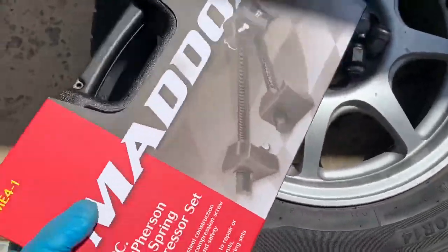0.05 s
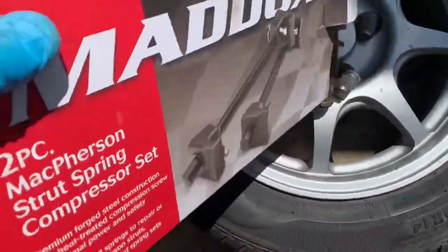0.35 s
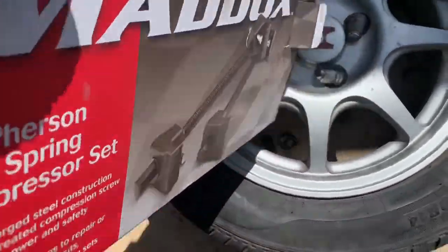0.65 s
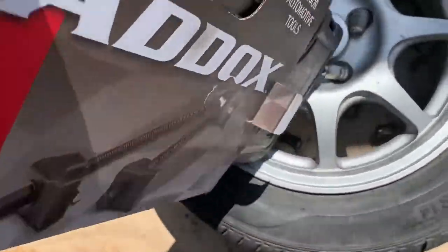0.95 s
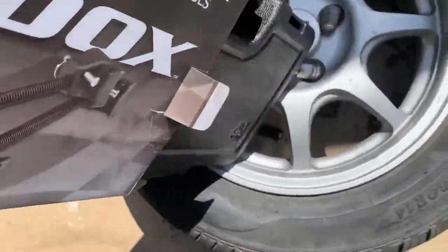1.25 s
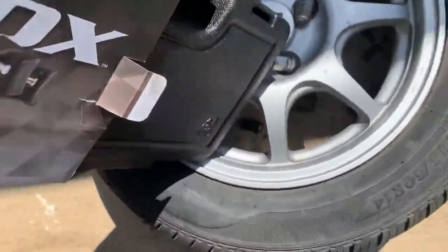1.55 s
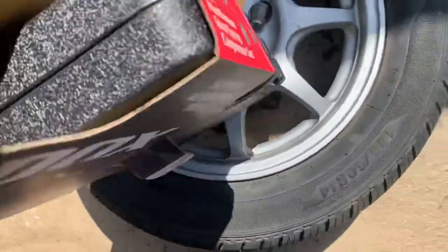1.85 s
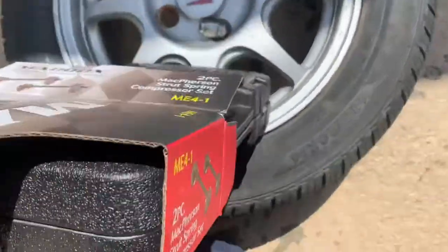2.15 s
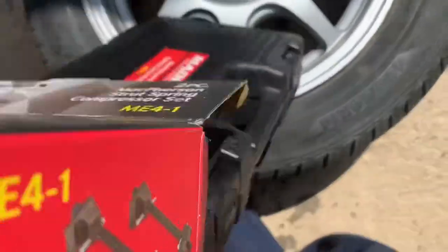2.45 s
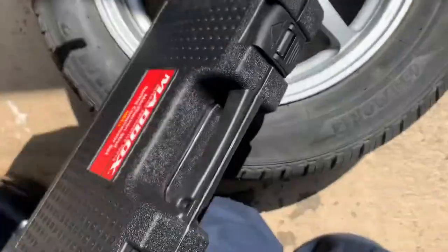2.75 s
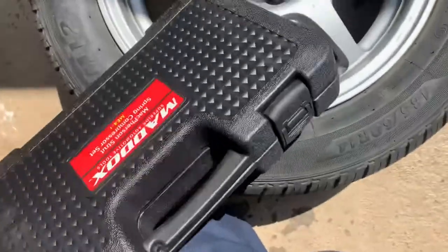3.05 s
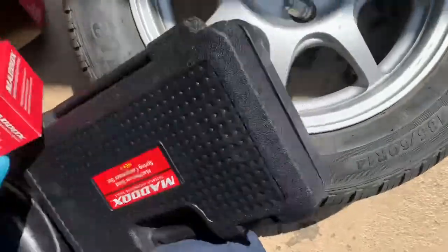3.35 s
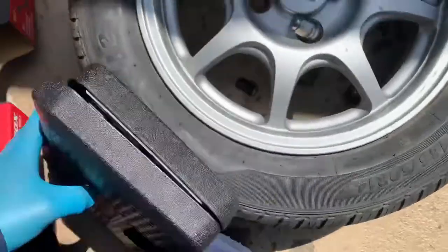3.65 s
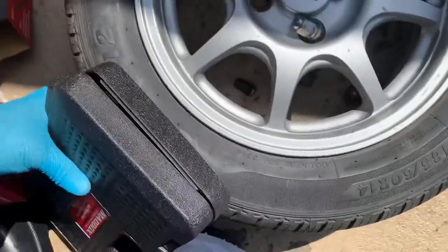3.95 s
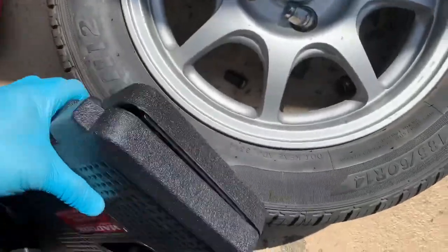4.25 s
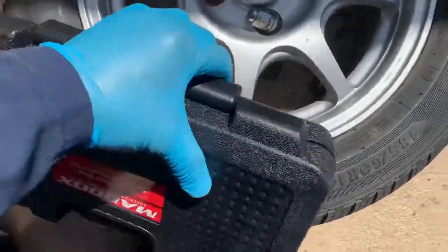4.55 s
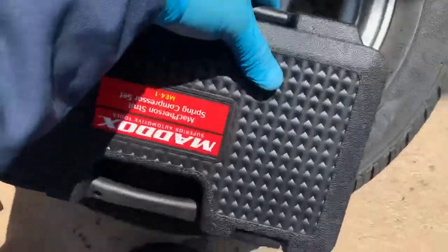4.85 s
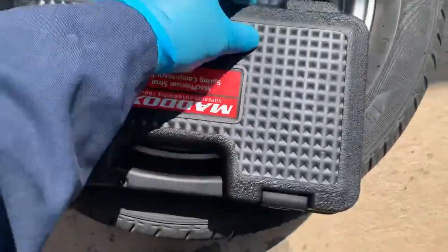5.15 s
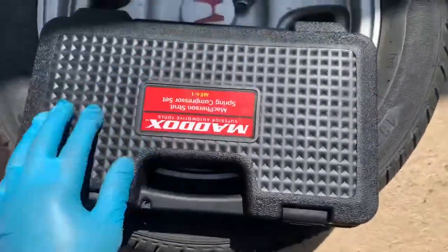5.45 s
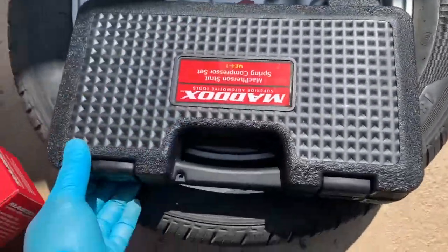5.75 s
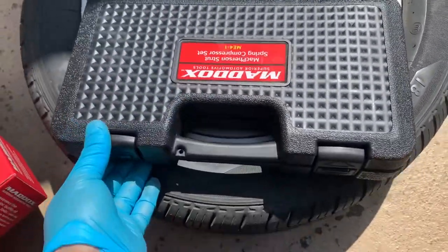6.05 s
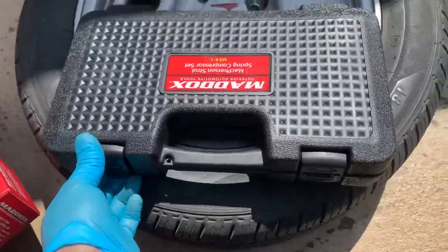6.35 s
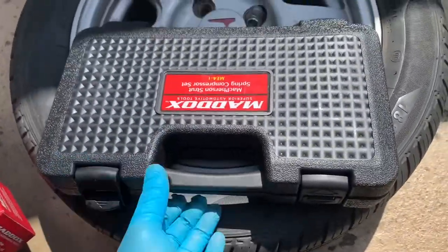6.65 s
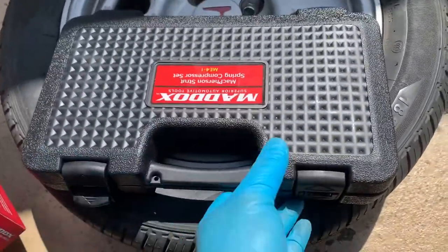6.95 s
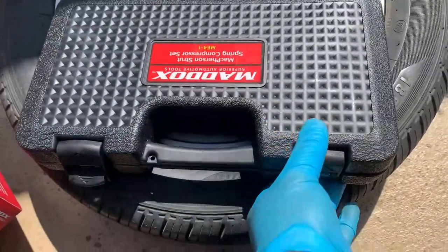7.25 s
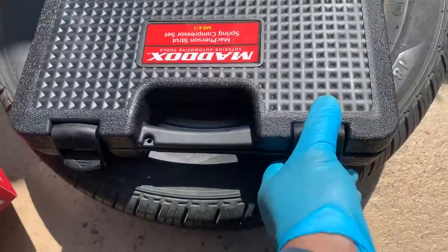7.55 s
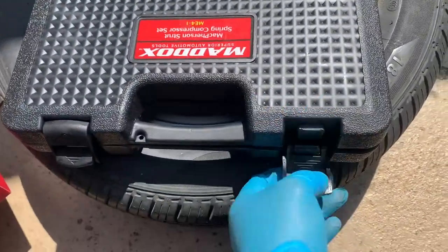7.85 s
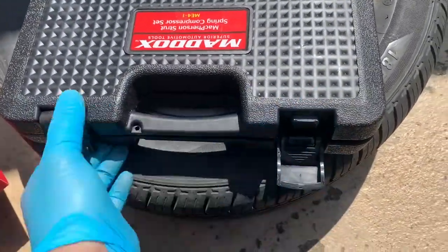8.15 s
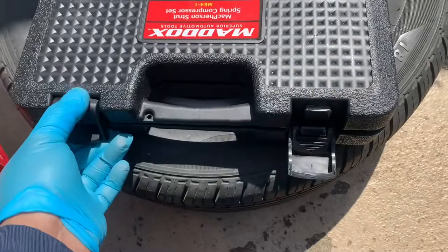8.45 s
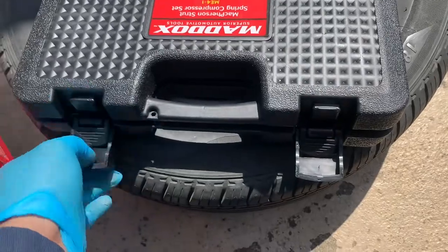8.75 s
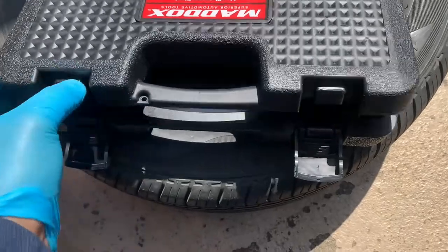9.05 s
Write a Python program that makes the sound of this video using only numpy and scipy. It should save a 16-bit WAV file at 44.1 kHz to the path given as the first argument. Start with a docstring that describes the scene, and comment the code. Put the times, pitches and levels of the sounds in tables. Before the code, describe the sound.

Cardboard rasps and steel tools clunk in a plastic case being unpacked outdoors, followed by glove scuffs and two latch snaps.

```python
"""Outdoors, close up, over low buffeting air, a hollow plastic tool case is shaken out of its card sleeve. The
sleeve first scrapes an alloy car wheel, which rings; the case rasps out in uneven tugs, free by 3 s. Gloves
turn the case over and lay it on a tyre while steel tools slide, clink and knock on the shell. From 5 s fingers
scuff and squeak along the rim; a latch is flipped at 6.4 s. Two latches snap open at 7.4 and 7.8 s, thudding on
the shell and drumming the lid, and at 9 s the hinge creaks as the lid lifts."""
import sys
import numpy as np
from scipy import signal
from scipy.fft import rfft, irfft, next_fast_len
from scipy.io import wavfile
from scipy.ndimage import uniform_filter1d, map_coordinates

SR = 44100
rng = np.random.default_rng(int(sys.argv[2]) if len(sys.argv) > 2 else 0)


def generate_wav(signal):
    """Clip the signal to [-1, 1] and save it as 16-bit WAV at the path in sys.argv[1]."""
    frames = np.transpose(np.atleast_2d(signal))
    scaled = np.clip(frames, -1, 1) * 32767
    pcm = np.round(scaled).astype(np.int16)
    wavfile.write(sys.argv[1], SR, pcm)


N = 409688
TIME = np.arange(N) / SR
AGE = TIME[:SR // 3]  # time since a blow [s]


def undb(db):
    """Decibels to gain."""
    return 10 ** (np.asarray(db) / 20)


def unit(x):
    """Scale a steady sound to rms 1."""
    return x / np.sqrt(np.mean(x ** 2))


def burst(x):
    """Scale a blow to the energy of 20 ms at rms 1."""
    return x / np.sqrt(np.sum(x ** 2) / len(x) / (SR / 50))


def add(out, s, x):
    """Mix a short sound in at time s."""
    i = int(s * SR)
    x, i = x[:, max(-i, 0):], max(i, 0)
    out[:, i:i + x.shape[1]] += x[:, :N - i]


def later(x, s):
    """Delay a blow by s seconds."""
    return np.pad(x, ((0, 0), (int(s * SR), 0)))[:, :len(AGE)]


def curve(rows):
    """One gain curve per dB column; silent outside the table's span."""
    times, *columns = np.transpose(rows)
    inside = uniform_filter1d(1. * ((TIME >= times[0]) & (TIME <= times[-1])), SR // 25)
    return np.array([inside * undb(np.interp(TIME, times, db)) for db in columns])


def stroke(start, length):
    """Envelope of a slide; longer ones start and end more gently."""
    ease_s = .054 * length
    attack = 1 + np.tanh((TIME - start) / (.0073 + ease_s))
    release = 1 - np.tanh((TIME - start - length) / (.02 + ease_s))
    return attack * release / 4


def onset(rise_s):
    """Contact building from 0 to 1."""
    return 1 - np.exp(-(AGE / rise_s) ** 2)


def fade(t60_s):
    """Exponential decay."""
    return np.exp(-np.log(1000) * AGE / t60_s)


def swell(rise_s):
    """Rounded rise to 1, slightly slower fall."""
    return (AGE / rise_s * np.exp(1 - AGE / rise_s)) ** 2


def noise(size, width):
    """Stereo white noise; width is side over mid."""
    mid, side = rng.standard_normal((2, size))
    return np.array([mid + width * side, mid - width * side])


def walk(rate_hz):
    """Smooth random wander, rms 1."""
    step = max(int(SR / rate_hz), 1)
    stairs = np.repeat(rng.standard_normal(N // step + 1), step)
    return unit(uniform_filter1d(stairs, step)[:N])


def colour(x, spectrum):
    """Minimum-phase filter with the given (Hz, dB) outline."""
    hz, db = np.transpose(spectrum)
    size = 4096
    grid = np.maximum(np.fft.rfftfreq(size, 1 / SR), 1)
    cepstrum = irfft(np.log(undb(np.interp(np.log(grid), np.log(hz), db))))
    cepstrum[1:size // 2] *= 2
    cepstrum[size // 2 + 1:] = 0
    response = irfft(np.exp(rfft(cepstrum)))
    return signal.fftconvolve(x, response[None], axes=1)[:, :x.shape[1]]


def splash(spectrum, t60_s, rise_s, width, tail_db):
    """Short modes too dense to tell apart, with a faint longer tail."""
    envelope = onset(rise_s) * (fade(t60_s) + undb(tail_db) * fade(3 * t60_s))
    return burst(colour(noise(len(AGE), width) * envelope, spectrum))


def ring(modes, scatter_db, spread_rad, detune=0, lead_s=0):
    """Decaying modes, weighted anew on each call; the left side leads by about lead_s."""
    out = 0
    for (hz, db, t60_s), (size, lag, tune, sign) in zip(modes, rng.standard_normal((len(modes), 4))):
        stereo_rad = (spread_rad * lag + np.pi * hz * lead_s) * np.array([[1], [-1]])
        phase = 2 * np.pi * hz * (1 + detune * tune) * AGE + stereo_rad
        out = out + np.sign(sign) * undb(db + scatter_db * size) * fade(t60_s) * np.sin(phase)
    return out


def struck_near(modes, pitch_hz, db_per_oct):
    """The place of a blow favours the modes near one pitch."""
    return [(hz, db - db_per_oct * abs(np.log2(hz / pitch_hz)), t60_s) for hz, db, t60_s in modes]


def drum(hz, rise_s, skew_rad):
    """A broad panel swells and dies within a few cycles; the left side leads by skew_rad."""
    return swell(rise_s) * np.sin(2 * np.pi * hz * AGE + skew_rad / 2 * np.array([[1], [-1]]))


def resonate(x, response):
    """Convolve with a response scaled to unit energy per side."""
    return signal.fftconvolve(x, response / np.sqrt(np.sum(response ** 2) / 2), axes=1)[:, :N]


def bend(x, ratio):
    """Shift all resonances of a steady sound by a moving ratio."""
    position = np.cumsum(ratio) % (N - 1)
    return np.array([map_coordinates(side, [position], order=2) for side in x])


def flexing():
    """Pitch ratio of a resonance wandering under a moving hand."""
    return 1 + .03 * walk(22)


def friction(slip_hz, scatter_db, jerk_db, jerk_hz, smooth, width):
    """Tiny uneven slips over a smooth rush; the motion comes in jerks."""
    sizes = (rng.random(N) < slip_hz / SR) * undb(scatter_db * np.minimum(rng.exponential(size=N), 4))
    slips = unit(sizes * np.tanh(noise(N, width)))
    rush = smooth * noise(N, width)
    return (slips + rush) * undb(jerk_db * np.clip(walk(jerk_hz), -2, 2))


def scraping(spectrum, slip_hz):
    """Slips on pebbled plastic, coloured by brief high shell modes that shift with the contact."""
    slips = friction(slip_hz, scatter_db=1, jerk_db=2, jerk_hz=60, smooth=.98, width=.91)
    rasp = colour(slips, spectrum)
    weights = np.array([undb(5 * walk(18)) for _ in range(4)])
    weights = weights / np.sqrt(np.sum(weights ** 2, axis=0))
    ragged = sum(weight * resonate(rasp, noise(len(AGE), .75) * fade(.0048)) for weight in weights)
    return unit(rasp + undb(-1.5) * ragged)


# air between gusts: (time [s], relative level [dB])
AIR_LEVELS = [(0.0, -33), (0.8, -44), (0.93, -30), (1.99, -42), (2.53, -30.5), (3.0, -46.5), (3.28, -49.5),
              (3.65, -31), (3.83, -45), (6.49, -42.5), (7.63, -33), (7.79, -36), (8.41, -41), (9.29, -40)]
# buffeting and outdoor background: (frequency [Hz], level [dB])
BUFFET_SPECTRUM = [(18, -31.5), (32, -14), (48, 0.5), (65, 2), (100, -2), (140, -5), (200, -12), (300, -17),
                   (500, -68)]
OUTDOOR_SPECTRUM = [(60, -11), (110, -3), (250, -23.5), (400, -6.5), (800, -26), (1500, -33.5), (4000, -42),
                    (8000, -52), (14000, -59.5)]


def air(shell_gain):
    """Low buffeting, stronger while the case moves, over a faint wavering background."""
    calm, = curve(AIR_LEVELS)
    buffet = unit(colour(noise(N, .53), BUFFET_SPECTRUM) * undb(2.5 * walk(16)))
    background = unit(colour(noise(N, .81), OUTDOOR_SPECTRUM)) * undb(3.5 * walk(6.5))
    return (undb(3.5) * calm + undb(-9.5) * shell_gain) * buffet + undb(-48) * background


# case tugged out of its sleeve, in curve segments: (time [s], shell [dB], card [dB], hiss [dB])
SLEEVE_SLIDE = [
    [(0, -45, -44.5, -46.5), (.11, -36, -39, -41.5), (.16, -24, -30, -44), (.32, -30, -36, -45),
     (.4, -32, -49.5, -54), (.51, -43, -49.5, -70.5)],
    [(.54, -34.5, -36, -44), (.62, -30.5, -37, -39.5), (.69, -22, -15.5, -19.5), (.745, -26, -41.5, -37),
     (.82, -22.5, -39.5, -45), (.98, -35, -50.5, -61.5), (1.04, -38, -36.5, -52),
     (1.17, -30.5, -40.5, -47.5), (1.25, -65, -75, -81)],
    [(1.51, -45, -68, -93), (1.65, -38, -55, -60), (1.78, -33.5, -38, -45.5), (1.86, -47, -49.5, -55),
     (1.92, -34, -40, -44.5), (2.05, -43, -59, -62)],
    [(2.04, -41, -49, -47), (2.19, -35, -47, -52), (2.25, -24, -27.5, -26.5), (2.33, -27, -26.5, -29),
     (2.39, -23.5, -34.5, -40), (2.42, -22.5, -35, -39.5), (2.48, -25.5, -48, -49), (2.51, -41.5, -58, -50),
     (2.56, -34, -44, -48), (2.6, -36.5, -61, -62), (2.75, -34.5, -59.5, -69), (2.93, -49, -55, -57)],
]
# tools sliding in their nests: (start [s], length [s], level [dB])
TOOL_SLIDES = [(1.236, 0.18, -42.5), (3.187, 0.12, -35), (3.376, 0.4, -43), (3.633, 0.18, -34.5),
               (4.092, 0.21, -38), (4.517, 0.27, -39), (5.033, 0.16, -36)]
# gloves and cloth on the case: (start [s], length [s], scrape [dB], hiss [dB])
GLOVE_RUBS = [(2.958, 0.26, -50, -51.5), (3.11, 0.11, -54, -48), (3.24, 0.092, -66, -53),
              (3.344, 0.29, -48.5, -46.5), (3.633, 0.12, -48.5, -51.5), (3.76, 0.31, -58, -58.5),
              (4.086, 0.15, -57, -59), (4.22, 0.13, -50.5, -46.5), (4.354, 0.78, -55.5, -60.5),
              (4.976, 0.22, -49.5, -50), (5.221, 0.3, -53.5, -40.5), (5.54, 0.17, -61, -54.5),
              (5.769, 0.048, -55, -56.5), (6.272, 0.12, -59.5, -68), (6.54, 0.13, -62, -50),
              (6.713, 0.032, -54.5, -54), (6.775, 0.12, -58.5, -60), (6.987, 0.1, -58, -53),
              (7.144, 0.062, -52, -54), (7.237, 0.068, -60, -58), (7.377, 0.11, -64, -64),
              (7.633, 0.29, -56, -59), (7.943, 0.082, -56, -46.5), (8.108, 0.17, -59.5, -57),
              (8.556, 0.089, -56, -60), (8.73, 0.077, -68.5, -56), (8.983, 0.19, -59, -60),
              (9.216, 0.13, -61.5, -60)]


def handling():
    """Friction gains as the sleeve comes off, the tools slide and hands turn the case."""
    shell, card, hiss = sum(curve(segment) for segment in SLEEVE_SLIDE)
    grip = stroke(start=2.7, length=TIME[-1])
    glove = undb(-68) * grip
    hiss = hiss + undb(-77) * grip
    for start, length, scrape_db, hiss_db in GLOVE_RUBS:
        rub = stroke(start, length)
        glove = glove + undb(scrape_db) * rub
        hiss = hiss + undb(hiss_db) * rub
    sliding = sum(undb(db) * stroke(start, length) for start, length, db in TOOL_SLIDES)
    return shell + sliding + undb(3.5) * glove, card, glove, hiss


# hollow shell; stiff ribs and corners: (frequency [Hz], level [dB], t60 [s])
SHELL_MODES = [(203.3, -5, 0.17), (301, -14.5, 0.039), (346.4, -1, 0.13), (391.2, -0.5, 0.087),
               (442, -1.5, 0.086), (520, -4.5, 0.094), (601.2, -2, 0.09), (644.6, -13.5, 0.12),
               (728.5, -2.5, 0.054), (818, -4.5, 0.061)]
RIB_MODES = [(870, -5, 0.044), (983, -8, 0.22), (1053, 0, 0.072), (1166, -0.5, 0.089), (1301, 0.5, 0.083),
             (1362, -4.5, 0.077), (1550, -1, 0.036), (1656, -3, 0.035), (1760, -16.5, 0.066)]
# rubbed shell: (frequency [Hz], level [dB])
DRONE_SPECTRUM = [(120, -24), (230, -9), (340, 6.5), (430, 0), (520, 2), (620, -3), (900, -9.5),
                  (1300, -20.5), (2200, -48.5)]


def shell_drone():
    """Sliding contact makes the hollow shell drone; loose parts rattle on its ribs."""
    judder = friction(slip_hz=580, scatter_db=1.5, jerk_db=3.5, jerk_hz=40, smooth=.44, width=.38)
    shell = ring(SHELL_MODES, scatter_db=1, spread_rad=.51, lead_s=.000073)
    hollow = unit(bend(resonate(judder, shell), flexing()))
    drone = unit(unit(colour(judder, DRONE_SPECTRUM)) + undb(-5) * hollow)
    loose = friction(slip_hz=130, scatter_db=2.5, jerk_db=1.5, jerk_hz=11, smooth=0, width=.5)
    rattle = unit(resonate(loose, ring(RIB_MODES, scatter_db=1, spread_rad=1)))
    return drone + undb(-16) * rattle


# card on plastic: (frequency [Hz], level [dB])
CARD_SPECTRUM = [(530, -19), (900, 2), (1420, -3), (1900, 0.5), (2900, -3), (3400, -7), (3900, -3),
                 (5000, -9.5), (8200, -13.5), (11700, -35)]
# card sleeve: (frequency [Hz], level [dB], t60 [s])
SLEEVE_MODES = [(955, -6.5, .02), (1250, -8, .025), (1950, 4, 0.038), (2290, 1.5, 0.027), (2980, -5, 0.053),
                (3760, -0.5, 0.035), (4330, -2.5, .035), (4620, -7.5, .03), (5630, -9, .02),
                (7150, -9, 0.012)]


def sleeve_rasp():
    """The case sticks and slips along the card, whose brief ring climbs as the sleeve empties."""
    slips = friction(slip_hz=700, scatter_db=3, jerk_db=2.5, jerk_hz=110, smooth=.35, width=1)
    ringing = unit(resonate(slips, ring(SLEEVE_MODES, scatter_db=1, spread_rad=.83)))
    rasp = scraping(CARD_SPECTRUM, slip_hz=1965)
    climb = 1 + .02 * TIME
    return unit(rasp + undb(-2.5) * bend(ringing, flexing() * climb))


# surface hiss; glove on the plastic's grain: (frequency [Hz], level [dB])
HISS_SPECTRUM = [(2500, -18), (4500, -2.5), (7000, -2.5), (9000, 3.5), (11000, 2.5), (13500, 3),
                 (15500, -5)]
GLOVE_SPECTRUM = [(700, -7.5), (1100, 3), (1450, 2), (2100, -3), (2900, 0.5), (4100, 1), (5200, -7),
                  (7500, -7), (11000, -30)]


def surface_rub(glove_gain, hiss_gain):
    """The plastic hisses and gloves rasp on its grain, under uneven hand pressure."""
    pressure = undb(2.2 * np.clip(walk(12), -2.5, 1.2))
    fine_slips = friction(slip_hz=12000, scatter_db=5.5, jerk_db=2, jerk_hz=44, smooth=.83, width=1)
    hiss = unit(colour(fine_slips, HISS_SPECTRUM))
    rasp = scraping(GLOVE_SPECTRUM, slip_hz=840)
    grip_shift = 1 + .04 * np.clip(walk(14), -2, 2)
    return pressure * (glove_gain * bend(rasp, grip_shift) + hiss_gain * hiss)


# scuffed shell; rib clatter; contact crack: (frequency [Hz], level [dB])
SCUFF_SPECTRUM = [(450, -15), (900, 3.5), (1300, 4.5), (1900, -3.5), (2400, -13.5), (4000, -20.5),
                  (8000, -38.5)]
CLATTER_SPECTRUM = [(500, -19), (800, 6.5), (1020, -1), (1250, -1), (1450, -2), (1620, -2.5), (2000, -15.5),
                    (3200, -31)]
CRACK_SPECTRUM = [(1200, -22), (2200, 6), (3400, 0), (5000, -7), (8000, -12), (15000, -15.5)]
GRAZE_S, GIVE_S = .008, .0028  # graze ahead of the hit; time the plastic takes to yield


def blow(pitch_hz, hardness_db):
    """A tool or latch grazes, then hits: panel and shell ring, ribs clatter, the contact cracks."""
    held = onset(GIVE_S) * fade(.3)  # hands damp the case
    modes = struck_near(SHELL_MODES, pitch_hz, db_per_oct=9)
    shell = ring(modes, scatter_db=3.5, spread_rad=.55, detune=.04)
    panel = drum(pitch_hz, rise_s=2.2 / pitch_hz, skew_rad=.5 * rng.standard_normal())
    note = undb(-4.5) * burst(panel) + undb(-3.3) * burst(held * shell)
    touch, retouch = (burst(held * ring(RIB_MODES, scatter_db=4.5, spread_rad=.76, detune=.02))
                      for _ in range(2))
    ribs = undb(-18) * (touch + undb(-3.5) * later(retouch, .014 * rng.uniform(.6, 1.4)))
    clatter = undb(-13) * splash(CLATTER_SPECTRUM, t60_s=.026, rise_s=GIVE_S, width=.73, tail_db=-16.5)
    crack = undb(-22.5) * splash(CRACK_SPECTRUM, t60_s=.052, rise_s=GIVE_S, width=1, tail_db=-19.5)
    graze = undb(-27) * splash(SCUFF_SPECTRUM, t60_s=.023, rise_s=GRAZE_S, width=.6, tail_db=-19.5)
    clatter_gain = undb(.73 * hardness_db)
    hit = note + clatter_gain * (ribs + clatter) + undb(hardness_db) * crack
    return clatter_gain * graze + later(hit, GRAZE_S)


# single blows on the shell, mostly tools; at 6.38 s a latch is flipped, at 7.45 and 7.82 s the latches thud as
# they let go: (time [s], level [dB], panel pitch [Hz], hardness [dB])
SHELL_KNOCKS = [(.001, -17.5, 294, -2.5), (.06, -21.5, 303, 3.5), (.12, -22.5, 470, -3), (.143, -26, 345, 4),
                (.218, -21, 378, -11), (.243, -24, 450, -1), (.255, -23, 315, 4), (.289, -22.5, 480, -3),
                (.313, -23, 408, 2), (.811, -17, 266, -15), (.909, -18, 322, -0.5), (1.406, -22, 300, -36.5),
                (1.464, -37, 346, 5), (1.621, -30.5, 550, 1), (1.725, -32, 410, -6), (2.045, -28.5, 656, -1),
                (2.102, -25, 620, 5), (2.118, -26.5, 399, 4.5), (2.144, -24, 367, -1.5),
                (2.419, -23.5, 398, 0), (2.44, -34, 603, -4), (2.466, -20.5, 392, -4),
                (2.484, -22, 335, -23), (2.583, -25.5, 423, -15), (2.591, -26, 620, 3.5),
                (2.611, -18, 414, -11), (2.7, -23.5, 507, -5), (2.816, -31.5, 890, 4.5),
                (2.853, -31.5, 424, -3), (3.069, -32.5, 450, -6), (3.183, -21, 716, 1), (3.209, -22, 696, 0),
                (3.226, -26, 536, 4), (3.26, -30, 450, -13), (3.375, -38.5, 800, 11),
                (3.404, -26.5, 785, -3), (3.441, -35.5, 780, -5), (3.511, -22.5, 1510, 6),
                (3.523, -22.5, 770, 1), (3.543, -27, 595, 3), (3.56, -21.5, 510, 8), (3.574, -27, 710, 2.5),
                (3.586, -13, 398, -2.5), (3.66, -28.5, 820, 7), (3.694, -22, 505, -1),
                (3.726, -26.5, 536, 3.5), (3.741, -21.5, 421, -10), (3.831, -30, 610, 1),
                (3.86, -29.5, 584, -3), (4.168, -18.5, 391, -2), (4.417, -38.5, 680, 8.5),
                (4.567, -36.5, 368, 15), (4.604, -31.5, 430, 4), (4.657, -29.5, 357, -19),
                (4.842, -31, 355, -26), (4.924, -26, 478, -8), (5.058, -21.5, 422, -18),
                (5.101, -24, 520, 10), (5.111, -27.5, 424, 0), (5.149, -33, 630, 7), (5.163, -42, 650, 6),
                (5.193, -36.5, 640, 4), (6.322, -54, 900, -2), (6.38, -26.5, 365, -6),
                (6.422, -41.5, 418, 0), (6.555, -36, 280, 4.5), (7.451, -28, 477, -15),
                (7.819, -30, 470, -14), (8.605, -38.5, 518, 0), (8.623, -37, 690, 0), (8.897, -41, 392, -12),
                (9.033, -34, 333, -1)]
# heavy tools toppling: (time [s], edge [dB], fall [s], landing [dB], panel pitch [Hz], hardness [dB])
TOOL_TOPPLES = [(.781, -10.5, 0.0077, -9, 321, 3), (2.073, -14.5, .009, -15, 421, -3),
                (3.165, -17, .034, -11.5, 400, -4), (3.504, -17, .012, -16, 442, 7),
                (4.217, -22, .008, -19, 457, -9), (5.038, -22, 0.0055, -14.5, 450, 5.5)]


def shell_knocks():
    """Tools knock on the shell and the latches thud on it; a heavy tool strikes edge first, lands flat and
    bounces once."""
    blows = list(SHELL_KNOCKS)
    for s, edge_db, fall_s, landing_db, hz, hardness_db in TOOL_TOPPLES:
        edge = (s, edge_db, hz * 1.602, hardness_db + 2.5)
        landing = (s + fall_s, landing_db, hz, hardness_db)
        bounce = (s + fall_s + .015, landing_db - 10, hz, hardness_db - 6)
        blows += [edge, landing, bounce]
    out = np.zeros((2, N))
    for s, db, hz, hardness_db in blows:
        add(out, s - GRAZE_S - GIVE_S / 2, undb(db) * blow(hz, hardness_db))
    return out


# soft bumps: (time [s], peak [dB], pitch [Hz])
PANEL_BUMPS = [(0.061, -16.5, 270), (.141, -13.5, 288), (.218, -12, 300), (.256, -12.5, 276),
               (0.495, -18.5, 99), (.803, -14, 247), (1.026, -20, 83), (1.724, -14.5, 68.6),
               (1.733, -19, 160), (2.405, -21, 160), (2.63, -17, 114), (3.529, -14.5, 115),
               (4.631, -20, 153), (5.395, -25.5, 114), (5.045, -23.5, 236), (5.589, -27, 100),
               (6.381, -20.5, 253), (6.722, -24, 258), (6.949, -22.5, 117), (7.198, -18, 101),
               (7.27, -23, 91), (7.565, -18, 126), (7.662, -16, 106), (7.86, -25, 286), (7.989, -23, 270),
               (8.09, -14.5, 86), (8.89, -24, 150)]


def panel_bumps():
    """Soft bumps set the broad panels drumming."""
    out = np.zeros((2, N))
    for s, db, hz in PANEL_BUMPS:
        add(out, s, undb(db) * drum(hz, rise_s=.0069, skew_rad=.45))
    return out


# alloy wheel: (frequency [Hz], level [dB], t60 [s])
WHEEL_MODES = [(1116, -3, 0.27), (1234, -3, 0.22), (1360, -4.5, 0.046), (1588, -2.5, .1), (1672, 2, 0.07),
               (1765, 2.5, 0.13), (1910, -5.5, 0.093), (2410, -6.5, .1), (2528, -5.5, 0.079),
               (3230, -5.5, 0.026), (4000, -5.5, 0.031), (4290, -6.5, 0.042), (6260, -10.5, 0.032),
               (7920, -10, 0.037)]
# dry card snapping: (frequency [Hz], level [dB])
SNAP_SPECTRUM = [(900, -6), (1400, -7.5), (1800, 3.5), (2700, -13), (3900, -2.5), (5500, -11.5),
                 (7700, -12), (11000, -31.5)]
# sleeve dragging and catching on the wheel: (time [s], level [dB])
WHEEL_DRAG = [(.11, -40.5), (.18, -29), (.33, -32), (.445, -27.5), (.47, -53.5), (.535, -55), (.58, -30.5),
              (.65, -34.5)]
WHEEL_CATCHES = [(0.16, -25), (.191, -21), (0.2413, -18), (0.2594, -23), (0.275, -30), (.287, -20.5),
                 (.316, -18.5), (0.328, -25.5), (.341, -26.5), (0.3585, -26), (.397, -24), (0.4159, -10.5),
                 (0.4329, -18), (0.448, -27.5), (.517, -31.5), (0.5469, -21), (0.5868, -28.5)]


def wheel_scrape():
    """The sleeve judders and catches on the spokes: the alloy rings, the card crackles."""
    drag, = curve(WHEEL_DRAG)
    slips = unit(friction(slip_hz=330, scatter_db=4, jerk_db=2, jerk_hz=80, smooth=.1, width=.62))
    alloy = resonate(drag * slips, ring(WHEEL_MODES, scatter_db=-.5, spread_rad=.33))
    crackle = drag * bend(colour(slips, SNAP_SPECTRUM), flexing())
    out = undb(-3) * alloy + undb(-8) * crackle
    damped = onset(.0023) * (fade(.014) + undb(-19.5))  # the card presses on and chokes the ring
    strongest_db = max(db for _, db in WHEEL_CATCHES)
    for s, db in WHEEL_CATCHES:
        hz = 1550 * 2 ** (.3 * rng.standard_normal())
        modes = struck_near(WHEEL_MODES, hz, db_per_oct=.25 * (strongest_db - db))  # weaker is duller
        clang = ring(modes, scatter_db=3.5, spread_rad=.4, detune=.006)
        crack = splash(SNAP_SPECTRUM, t60_s=.027, rise_s=.0011, width=.75, tail_db=-21)
        add(out, s, undb(db) * (burst(damped * clang) + undb(-9) * crack))
    return out


# card and glove ticks: (time [s], snap [dB], fizz [dB])
DRY_TICKS = [(0.1534, -37, -39), (0.181, -25.5, -35), (0.378, -35, -37), (0.619, -40, -29),
             (0.772, -29.5, -30), (0.7873, -21.5, -25), (0.844, -39, -60), (.889, -41.5, -40),
             (0.955, -59, -43), (1.0152, -21, -42), (1.024, -36, -50), (1.036, -41, -58), (1.278, -57, -57),
             (1.3155, -61, -50.5), (4.075, -64, -50.5), (4.118, -72, -55), (4.627, -59, -53),
             (5.1, -55, -51), (6.37, -44, -52), (6.551, -49.5, -51), (6.8952, -59.5, -56),
             (8.164, -59, -65), (8.473, -63, -67), (8.622, -54, -47)]


def dry_ticks():
    """Card edges and gloves flick against the case."""
    out = np.zeros((2, N))
    for s, snap_db, fizz_db in DRY_TICKS:
        snap = splash(SNAP_SPECTRUM, t60_s=.016, rise_s=.0098, width=.51, tail_db=-26.5)
        fizz = splash(HISS_SPECTRUM, t60_s=.012, rise_s=.001, width=1, tail_db=-17.5)
        add(out, s, undb(snap_db) * snap + undb(fizz_db) * fizz)
    return out


# case corner snagging in the sleeve: (time [s], level [dB], pitch [Hz])
SLEEVE_SNAGS = [(.663, -28, 2400), (.675, -22, 4100), (.689, -27, 4100), (1.016, -25, 3800),
                (2.279, -34, 4100), (2.323, -33.5, 4000), (2.362, -33, 2300), (2.411, -30.5, 2350),
                (2.424, -31.5, 2200), (2.439, -37, 2350), (2.472, -37.5, 2170)]


def sleeve_snags():
    """The card holds for an instant, then rips past in a short rasp."""
    out = np.zeros((2, N))
    for s, db, hz in SLEEVE_SNAGS:
        modes = struck_near(SLEEVE_MODES, hz, db_per_oct=17)
        card = ring(modes, scatter_db=3, spread_rad=.77, detune=.0091)
        rip = noise(len(AGE), .55) * swell(.004)
        add(out, s, undb(db) * burst(resonate(rip, card)))
    return out


# steel tools: (frequency [Hz], level [dB], t60 [s])
STEEL_MODES = [(3180, -9.5, 0.061), (3300, -6, 0.07), (4270, -15, 0.026), (4690, -9, 0.038),
               (5130, -10, 0.033), (5130, -3, 0.058), (7321, -4, 0.029), (7780, 2, 0.03),
               (8040, -0.5, 0.028), (10550, 0, 0.053)]
# steel on steel: (time [s], level [dB], pitch [Hz])
TOOL_CLINKS = [(0.7905, -26, 3340), (3.206, -34.5, 3250), (3.516, -21, 6470), (5.037, -33, 3260)]


def tool_clinks():
    """Steel parts collide and chatter as they ring, choked by their moulded nests."""
    out = np.zeros((2, N))
    for s, db, hz in TOOL_CLINKS:
        chatter = (1 + 1.2 * walk(600)[:len(AGE)]) * (1 - np.exp(-AGE / .001))
        modes = struck_near(STEEL_MODES, hz, db_per_oct=9)
        steel = ring(modes, scatter_db=1.5, spread_rad=.6, detune=.005)
        add(out, s, undb(db) * burst(chatter * steel))
    return out


def wheel_tap(time_s=3.204, level_db=-25.5):
    """The swinging case taps the wheel and rings its lowest modes."""
    out = np.zeros((2, N))
    modes = struck_near(WHEEL_MODES, pitch_hz=1140, db_per_oct=43)
    alloy = ring(modes, scatter_db=-1.5, spread_rad=.37, detune=.013)
    add(out, time_s, undb(level_db) * burst(alloy * fade(.27)))
    return out


# fingers and latches on the rim: (start [s], length [s], level [dB])
RIM_SCUFFS = [(4.976, 0.086, -44), (6.287, 0.11, -66), (7.377, 0.047, -51.5), (7.437, 0.033, -43),
              (7.618, .025, -48), (7.719, .045, -45.5), (7.795, .02, -42), (7.835, 0.038, -41),
              (7.98, 0.019, -43), (8.151, 0.043, -48), (8.328, 0.21, -60.5), (8.558, 0.069, -54.5),
              (8.752, 0.28, -67), (9.015, 0.034, -41), (9.06, .09, -61), (9.182, 0.068, -51)]


def rim_scuffs():
    """Fingers feel for the latches and drag them over the rim in quick jerks."""
    jerks = unit(undb(3.5 * np.clip(walk(170), -2, 2)))
    strokes = sum(undb(db) * stroke(start, length) for start, length, db in RIM_SCUFFS)
    return strokes * jerks * scraping(SCUFF_SPECTRUM, slip_hz=400)


# rubber fingertips on plastic: (time [s], level [dB], pitch [Hz])
FINGER_SQUEAKS = [(5.79, -59, 4000), (6.488, -65, 2950), (6.514, -58.5, 4130), (6.769, -55, 1805),
                  (6.779, -59, 2100), (8.268, -61.5, 4700), (8.795, -63, 5280)]


def finger_squeaks(glide_per_s=1.4, roughness=.11):
    """A fingertip sticks and slips fast enough to give a short, rough, rising note."""
    out = np.zeros((2, N))
    for s, db, hz in FINGER_SQUEAKS:
        grip = np.abs(walk(500)[:len(AGE)])
        pitch_hz = hz * (1 + glide_per_s * AGE + roughness * walk(900)[:len(AGE)])
        tone = np.sin(2 * np.pi * np.cumsum(pitch_hz) / SR)
        add(out, s, undb(db) * burst(swell(.0068) * grip * tone[None]))
    return out


# latches letting go: (time [s], snap [dB], fizz [dB], lid [dB], rebound delay [s])
LATCH_RELEASES = [(7.444, -32, -41, -7.5, .046), (7.811, -25.5, -51, -9.5, 0.037)]
# latch snap: (frequency [Hz], level [dB])
LATCH_SPECTRUM = [(450, 2.5), (620, 7.5), (820, -15), (1200, -1), (1800, -9.5), (2600, -17.5), (3600, -16),
                  (6000, -44), (10000, -44)]


def latches(rebound_db=-12, lid_lag_s=.004):
    """Each latch snaps over its lip and rebounds; the broad lid answers like a drum."""
    out = np.zeros((2, N))
    lid = drum(hz=251, rise_s=.01, skew_rad=0)
    for release_s, snap_db, fizz_db, lid_db, rebound_s in LATCH_RELEASES:
        for s, db in ((release_s, 0), (release_s + rebound_s, rebound_db)):
            snap = splash(LATCH_SPECTRUM, t60_s=.018, rise_s=GIVE_S, width=.32, tail_db=-16)
            fizz = splash(HISS_SPECTRUM, t60_s=.024, rise_s=.001, width=1, tail_db=-27)
            add(out, s, undb(db + snap_db) * snap + undb(db + fizz_db) * fizz)
            add(out, s + lid_lag_s, undb(db + lid_db) * lid)
    return out


# lid hinge: (time [s], level [dB], pitch [Hz])
HINGE_CREAKS = [(9.0327, -45, 1840), (9.0603, -64, 2250), (9.083, -47.5, 2040), (9.121, -55, 2000),
                (9.136, -46, 1860)]


def hinge_creaks():
    """The hinge creaks in short pitched ticks as the lid lifts."""
    out = np.zeros((2, N))
    for s, db, hz in HINGE_CREAKS:
        spectrum = [(hz / 2, -24), (hz, 0), (hz * 2, -28)]
        add(out, s, undb(db) * splash(spectrum, t60_s=.029, rise_s=.00087, width=.43, tail_db=-20))
    return out


def scene():
    """All within arm's reach; the ground and the car's side return a faint scatter."""
    shell_gain, card_gain, glove_gain, hiss_gain = handling()
    near = shell_gain * shell_drone() + card_gain * sleeve_rasp() + surface_rub(glove_gain, hiss_gain)
    near += shell_knocks() + panel_bumps() + wheel_scrape() + dry_ticks() + sleeve_snags()
    near += tool_clinks() + wheel_tap() + rim_scuffs() + finger_squeaks() + latches() + hinge_creaks()
    echoes = noise(len(AGE), .27) * fade(.14) * (1 - np.exp(-AGE / .0056))
    scatter = colour(echoes, [(200, 1.5), (1000, 3), (4000, -1), (14000, -18)])
    return near + undb(-18) * resonate(near, scatter) + air(shell_gain)


def widen(x, above_hz=7900, delay_s=.000292):
    """Feed each side's treble, slightly late, into the other."""
    size = next_fast_len(N + SR // 10)
    hz = np.fft.rfftfreq(size, 1 / SR)
    share = .95 / (1 + (above_hz / np.maximum(hz, 1)) ** 30)
    sides = rfft(x, size)
    crossfeed = share * np.exp(-2j * np.pi * hz * delay_s) * sides[::-1]
    return irfft((sides + crossfeed) / np.hypot(1, share), size)[:, :N]


def record(dry):
    """Widen the treble, round the highest peaks, low-pass at 15.7 kHz."""
    wide = widen(dry)
    rounded = wide / (1 + wide ** 4) ** (1 / 4)
    return signal.sosfilt(signal.ellip(8, .2, 70, 15700, fs=SR, output="sos"), rounded)


dry = scene()
out = record(dry)
generate_wav(out)
```